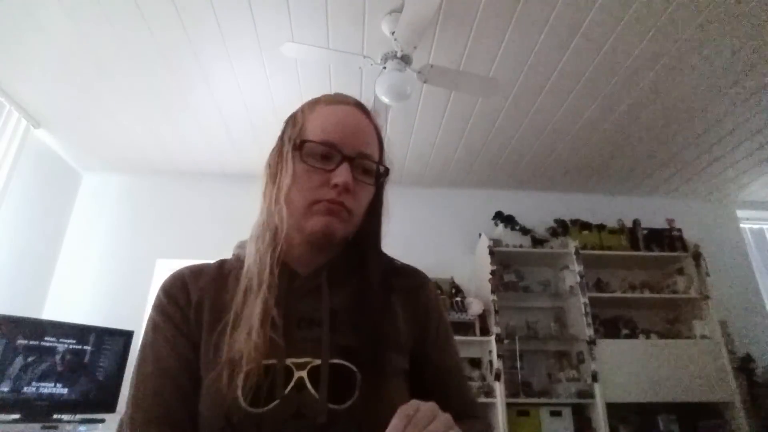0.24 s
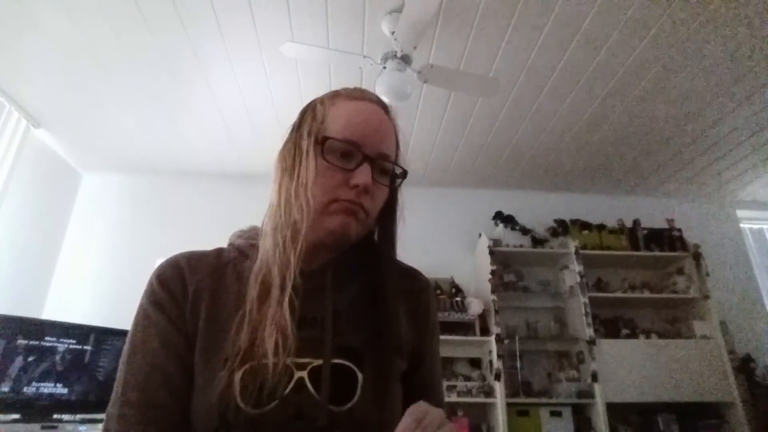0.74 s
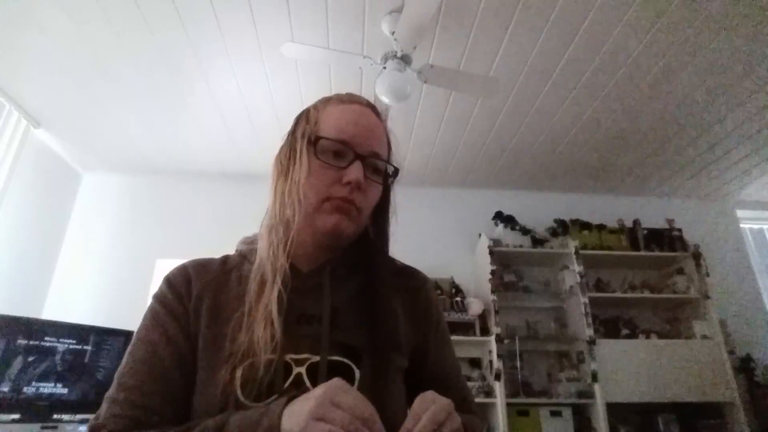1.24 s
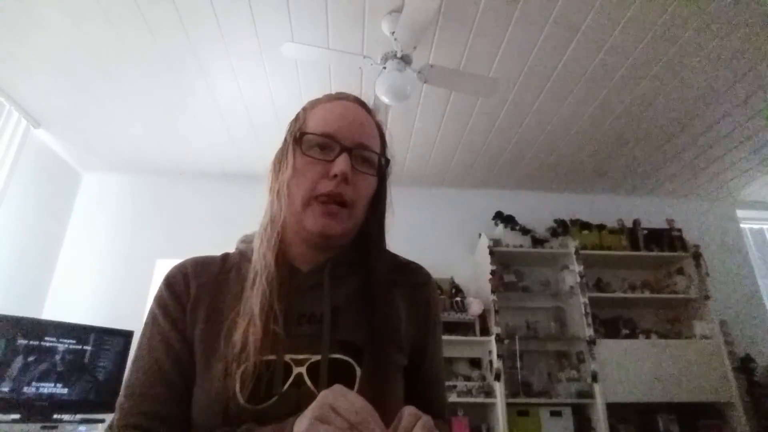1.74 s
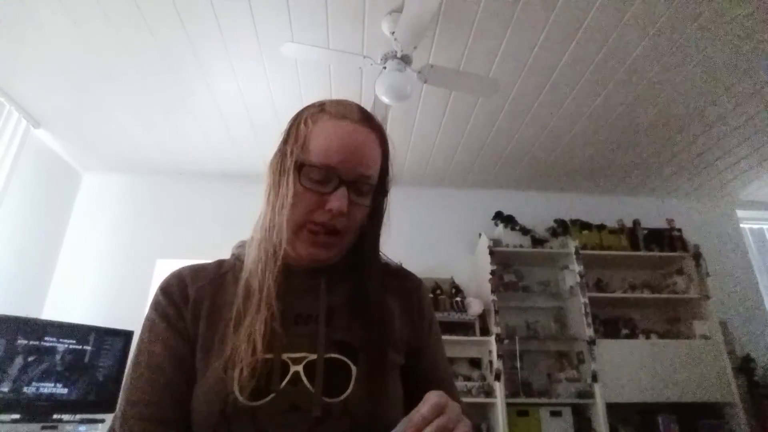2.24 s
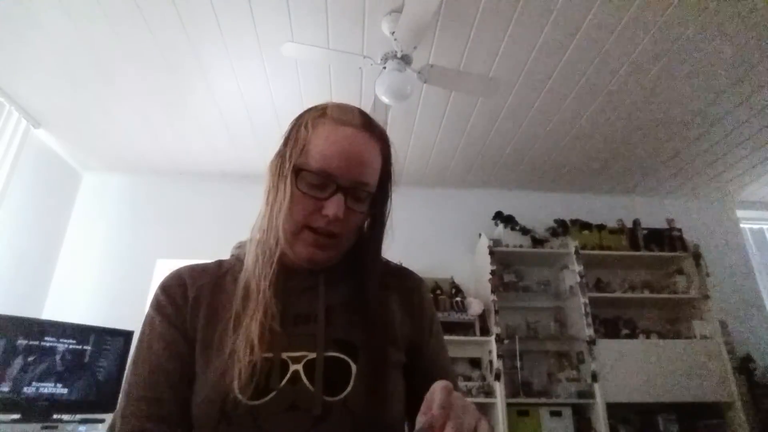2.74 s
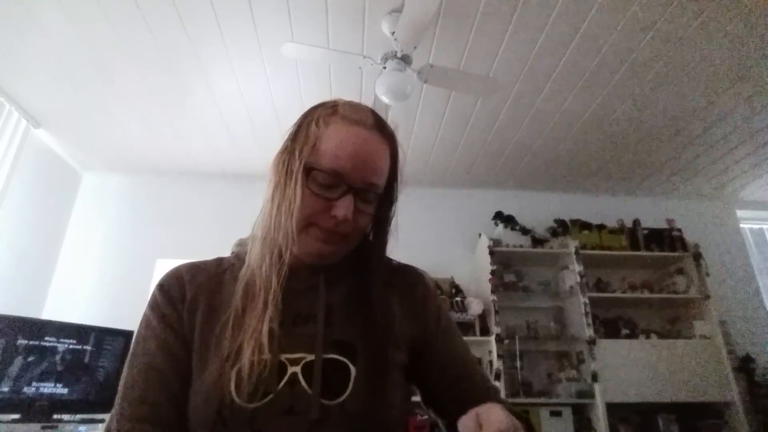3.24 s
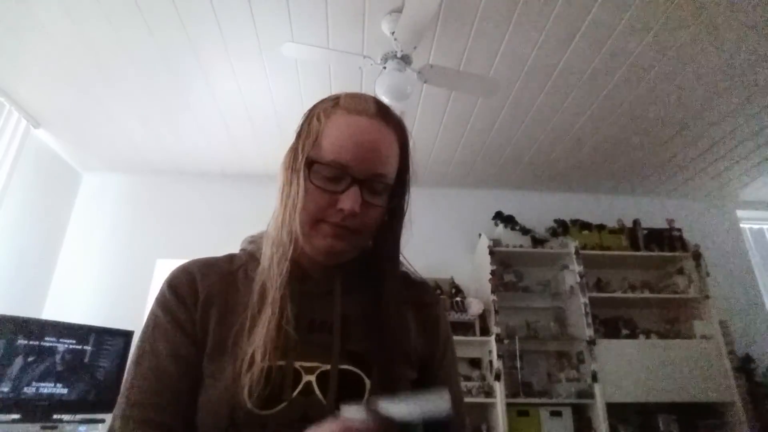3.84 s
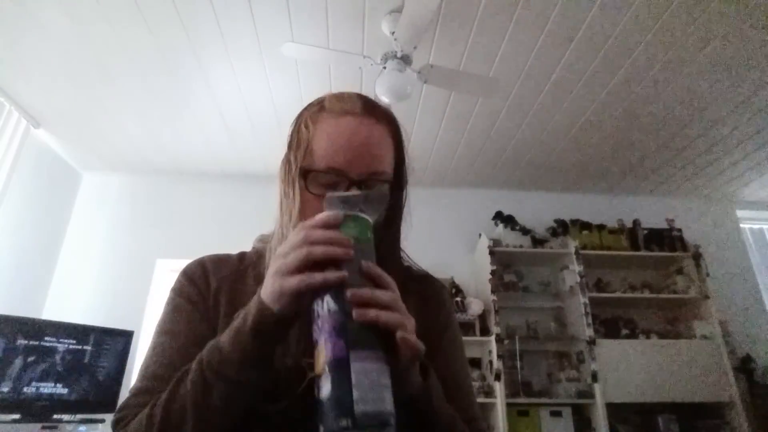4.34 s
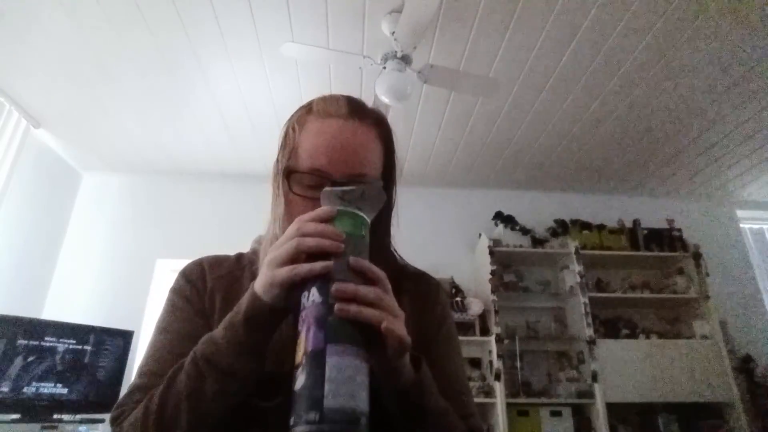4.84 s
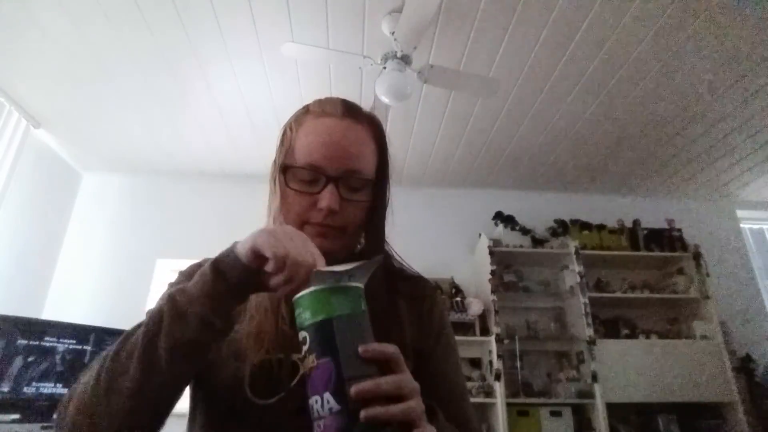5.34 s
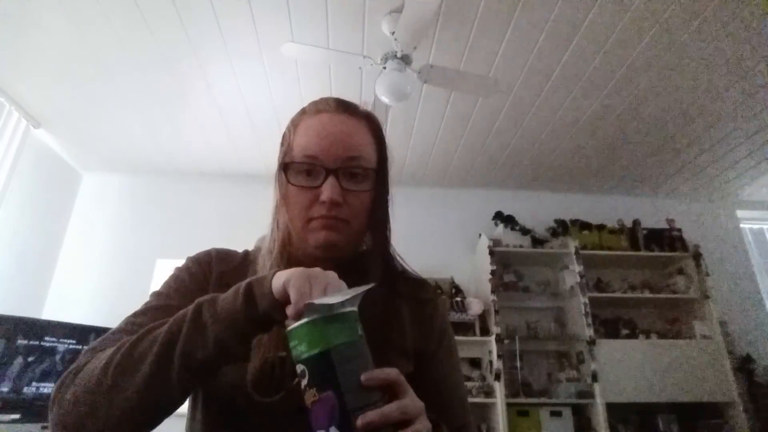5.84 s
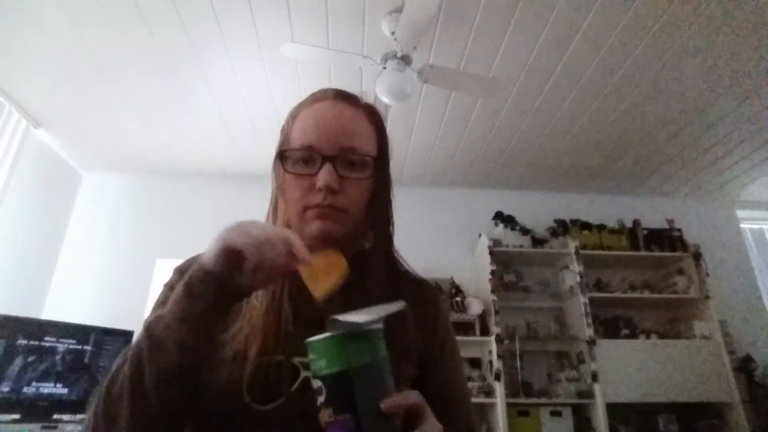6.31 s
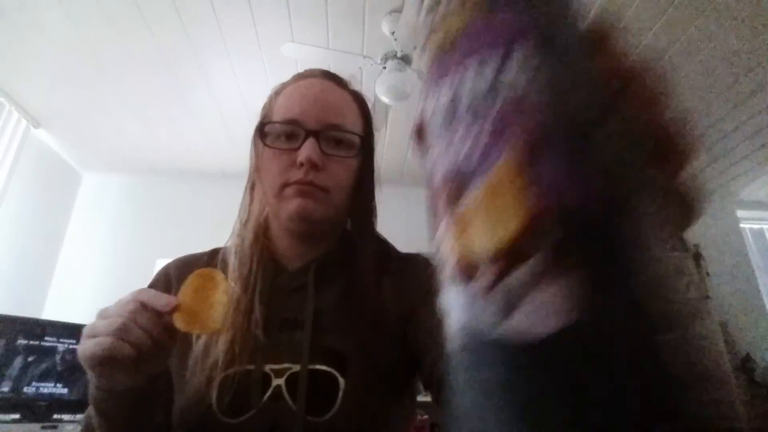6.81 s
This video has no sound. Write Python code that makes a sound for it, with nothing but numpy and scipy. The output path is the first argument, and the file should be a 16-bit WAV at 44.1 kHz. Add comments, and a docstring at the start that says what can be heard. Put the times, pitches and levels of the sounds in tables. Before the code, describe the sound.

Close by in a quiet room, a plastic lid pops hollowly off a cardboard tube, its foil seal rips, and a chip slides out.

```python
"""Fingers are heard first, rubbing and slipping on the plastic lid of a cardboard snack can, close by
in a quiet living room, until the lid pops off. The foil seal is torn in a few crackling pulls while the
air in the tube rings higher; then the can is lifted and a chip is drawn out with slides and knocks.
Friction and tearing are random grains of decaying noise, struck parts are sums of dying sines, and the
can is a bank of resonators; a sparse decaying echo adds the room, filtered noise and a hum the background."""
import sys
import numpy as np
from scipy import signal
from scipy.io import wavfile

SR = 44100
rng = np.random.default_rng(int(sys.argv[2]) if len(sys.argv) > 2 else 0)


def bounce(signal):
    """Save signal as a 16-bit WAV file at the path given by the first command-line argument."""
    frames = np.transpose(np.atleast_2d(signal))
    limited = np.clip(frames, -1, 1)
    pcm = np.round(limited * 32767).astype(np.int16)
    wavfile.write(sys.argv[1], SR, pcm)


N = 311875
TIME = np.arange(N) / SR  # seconds

# Spectrum of the steady background. Each row: frequency in Hz, gain in dB.
BACKGROUND_COLOUR = [(20, -49), (45, -37), (90, -47), (160, -54), (280, -57), (450, -66), (750, -71),
                     (1100, -87), (2200, -93.5), (4000, -89), (10500, -100), (11700, -90), (12800, -94),
                     (16000, -93.5)]
# Noise that differs between the ports, against the shared noise. Each row: frequency in Hz, gain in dB.
BACKGROUND_APART = [(300, -17), (1500, 7.5), (5000, 0.5)]
HUM_HZ, HUM_DB = 48.8, -68
# Spells of faint high hiss. Each row: middle in seconds, relative level in dB.
HISS_SPELLS = [(0.238, -73), (.432, -73), (.98, -69.5), (2.275, -77), (3.719, -75), (4.018, -76),
               (4.219, -75), (4.838, -80.5), (5.05, -87), (6.278, -76.5), (6.89, -79), (7.03, -82.5)]
# Spectrum of that hiss. Each row: frequency in Hz, gain in dB.
HISS_COLOUR = [(4000, -31.5), (9000, -22), (11400, -5), (11650, 15.5), (11900, 5), (12150, -4.5),
               (15000, -10)]
HISS_S = 0.079  # length of each spell

# Decay of the room by band. Each row: frequency in Hz, time to fall by 60 dB in seconds.
ROOM_T60 = [(100, 0.54), (500, 0.39), (2000, 0.38), (8000, 0.27), (16000, 0.26)]
# Likeness of the echo at the two ports. Each row: frequency in Hz, correlation from 0 to 1.
ROOM_LIKENESS = [(400, 0.45), (1500, .7), (4000, 0.26)]
# Responses of the two microphone ports. Each row: frequency in Hz, gain in dB.
LEFT_PORT = [(200, -.5), (700, -.3), (1050, -5), (1600, -3), (2900, -4), (3800, -13), (6300, -11),
             (7200, -13), (8400, -2), (10100, -1), (10800, 10), (12100, 13), (12900, 7), (15600, 1)]
RIGHT_PORT = [(200, .5), (700, .3), (980, -4), (1300, 5), (1900, 4), (2800, 0), (3300, -8), (4500, 4),
              (5000, -2), (7000, 5), (9600, 4), (10200, -2), (11900, 2), (15600, -7)]
BASS_CUT_HZ, EDGE_HZ = 43, 15900

# Hands shifting on the cardboard. Each row: middle in seconds, length in seconds, relative level in dB.
GRIP_STROKES = [(.2, 0.2, -74), (1.25, 0.97, -78), (1.83, 0.48, -73), (2.17, 0.26, -71.5),
                (2.42, 0.45, -63), (2.55, 0.24, -68), (3.29, 0.11, -60), (3.48, 0.26, -67),
                (3.72, 0.57, -69.5), (4.1, 0.4, -66.5), (4.46, 0.19, -73), (4.7, .16, -71), (4.98, .3, -73),
                (5.71, 0.13, -69.5), (6.12, 0.69, -68.5), (6.88, 0.38, -70.5), (7.06, 0.13, -59.5)]
# Spectrum of gripped cardboard. Each row: frequency in Hz, gain in dB.
GRIP_COLOUR = [(30, -16.5), (90, -4.5), (170, 3), (300, 7.5), (420, 2.5), (560, -8), (800, -8),
               (1100, -11.5), (3000, -65), (16000, -51)]
HOLD_DB = -75.5  # drive from fingers creeping on the can all the while
# Fingers and chips bumping the tube. Each row: time in seconds, ring level in dB, dull thud level in dB.
KNOCKS = [(0.177, -84, -44), (.375, -68, -43), (0.938, -58.5, -37), (1.177, -77, -41.5),
          (1.611, -75.5, -44), (2.007, -50, -35.5), (2.118, -67, -43.5), (2.499, -56.5, -46),
          (2.605, -52.5, -74), (3.705, -57, -53), (3.815, -60.5, -57), (4.022, -54, -68),
          (4.159, -58.5, -56), (4.989, -59.5, -57), (5.073, -66.5, -53), (5.586, -52.5, -69),
          (5.967, -62, -42), (6.018, -56.5, -79), (6.166, -56.5, -87), (6.507, -61, -70),
          (6.607, -59.5, -63), (6.919, -68, -40.5), (7.009, -58, -59.5), (7.057, -62, -43)]
# Ringing of the bumped tube. Each row: frequency in Hz, level in dB, time to fall by 60 dB in seconds.
KNOCK_MODES = [(262, 0, 0.19), (281.8, -0.5, 0.0094), (390, -12, .05), (520, -13.5, 0.1), (780, -6, .04)]
# Treble loss under soft fingertips. Each row: frequency in Hz, gain in dB.
FINGERTIP_COLOUR = [(100, 1.0), (500, 0), (900, -14), (1800, -42.5), (5000, -41)]
# Lowest air resonance of the tube, rising as its mouth is uncovered and later settling lower.
# Each row: time in seconds, frequency in Hz.
TUBE_HZ = [(2.3, 217), (2.72, 224), (2.83, 246), (2.96, 268), (3.07, 266.6), (3.6, 248)]

# Fingers picking at the foil tab, later the loose foil settling.
# Each row: middle in seconds, length in seconds, relative level in dB.
FOIL_RUB = [(2.17, 0.039, -73), (2.35, 1.9, -78), (2.485, 0.062, -67.5), (2.62, 0.36, -84),
            (3.55, 1.33, -84), (3.6, 0.044, -72), (3.7, 0.2, -87), (3.82, 0.013, -77.5)]
# Spectrum of rubbed foil. Each row: frequency in Hz, gain in dB.
FOIL_RUB_COLOUR = [(100, -17), (620, 18.5), (1000, 4.5), (2000, -0.5), (3200, 1), (8000, -16.5),
                   (16000, -6)]
# Fingers and a chip sliding in the tube. Each row: middle in seconds, length in seconds, relative level in dB.
SLIDE_STROKES = [(5.69, 0.14, -74.5), (5.83, 0.086, -90.5), (5.915, .025, -80), (6.021, 0.0077, -73.5),
                 (6.14, 0.27, -89)]
# Spectrum of the sliding. Each row: frequency in Hz, gain in dB.
SLIDE_COLOUR = [(300, -12.5), (1500, -9.5), (2100, 0.5), (2700, 11.5), (3600, 5), (5000, 0), (9000, -5),
                (16000, -1)]
# Nails, foil and chips tapping.
# Each row: time in seconds, click level in dB, ring frequency in Hz, ring level in dB.
TICKS = [(0.376, -43.5, 4350, -41), (1.355, -51, 13100, -44), (1.364, -77, 4750, -51),
         (1.614, -71, 737.6, -51.5), (2.488, -70, 2710, -53), (2.531, -52.5, 2200, -55.5),
         (2.602, -58, 2760, -55), (3.146, -50, 520, -30.5), (3.328, -56, 1810, -48),
         (3.604, -58, 2070, -50.5), (3.813, -53, 800, -50.5), (4.158, -68.5, 567, -56.5),
         (4.19, -63, 2010, -72), (5.051, -57, 2890, -57), (6.086, -60, 2650, -67),
         (6.214, -60.5, 2810, -75)]
# Spectrum of the tap clicks. Each row: frequency in Hz, gain in dB.
TICK_COLOUR = [(200, -10.5), (1000, 22), (1600, 8), (3000, 1.5), (4600, -1), (8000, -2.5), (11000, 4.5),
               (16000, -20.5)]

# Finger strokes on the lid and rim. Each row: middle in seconds, length in seconds, relative level in dB.
LID_RUB = [(-0.014, 0.055, -68.5), (0.246, 0.27, -71), (0.854, 0.093, -63), (0.933, 0.064, -66),
           (0.994, 0.15, -67.5), (1.095, 0.051, -65), (1.173, 0.072, -64), (1.257, 0.037, -67),
           (1.38, 0.11, -68.5), (1.442, 0.012, -62.5), (1.776, 0.014, -72)]
# Rim of the lid slipping over the bead of the can. Each row: time in seconds, relative level in dB.
LID_SLIPS = [(.087, -53), (.093, -54.5), (.223, -48), (.268, -48), (.936, -38), (.944, -39.5), (.951, -52),
             (1.022, -61), (1.177, -42.5), (1.184, -46), (1.752, -63)]
# Duller part of the slips. Each row: frequency in Hz, gain in dB.
SLIP_COLOUR = [(150, -13), (600, 9), (2000, -4.5), (5000, -13), (14000, -8.0)]
# Resonances of the lid seated on the can. Each row: frequency in Hz, width in Hz, gain in dB.
LID_SEATED = [(626, 84, 2.5), (770, 60, 5), (1433, 79, 13.5), (1592, 100, 12), (1763, 53, 11.5)]
# Spectrum of rubbed plastic on the can. Each row: frequency in Hz, gain in dB.
LID_COLOUR = [(60, -9), (250, 21.5), (700, 7), (1000, 5.5), (1600, -2), (2400, 1.5), (3200, -1.5),
              (4500, -1.5), (8000, -9.5), (12000, 2), (16000, -23)]
# The lid springing free and wobbling.
# Each row: time in seconds, push level in dB, rim scrape level in dB, scrape decay constant in seconds.
POPS = [(1.891, -53, -54.5, 0.043), (1.908, -37.5, -27.5, 0.015), (1.9188, -23, -29.5, 0.03),
        (1.943, -54.5, -29.5, 0.0082), (2.008, -42.5, -49, 0.016), (2.019, -63, -51.5, 0.0078)]
# Lid and tube ringing after the pop. Each row: frequency in Hz, level in dB, time to fall by 60 dB in seconds.
LID_MODES = [(72, -18.5, 0.074), (117.7, 1.5, 0.068), (193.8, 1, 0.11), (382.5, -24.5, 0.51),
             (870, -9.5, 0.096), (1195, -20, 0.13), (1306, -13, 0.052), (1650, -20, 0.029)]
# Spectrum of the rim scrape. Each row: frequency in Hz, gain in dB.
SCRAPE_COLOUR = [(60, -5), (400, 15), (1000, 1), (1500, -6), (3000, 0), (7000, -7), (12000, -10),
                 (16000, -14)]

# Pulls on the foil. Each row: start in seconds, length in seconds, relative crackle level in dB,
# swell of the crackle over the pull in dB, relative level of the shaking of the can in dB.
PULLS = [(2.678, .064, -44.5, 10.5, -35.5), (2.785, 0.012, -34, -3, -33), (2.822, .15, -38, 5, -35.5),
         (3.037, 0.067, -36, 2, -35), (3.148, 0.072, -55, 4, -46.5)]
# A pull bites at once; when it stops the foil falls quiet at its own pace and the can at another.
PULL_ATTACK_S, CRACKLE_RELEASE_S, SHAKE_RELEASE_S = .005, 0.015, 0.014
# Loudest snaps of the glued seam giving way. Each row: time in seconds, relative level in dB.
SNAPS = [(2.7203, -22), (2.743, -25.5), (2.7893, -28), (2.8252, -19), (2.838, -18), (2.8464, -22.5),
         (2.8571, -18.5), (2.897, -20), (2.905, -19), (2.9159, -15), (2.9259, -17), (2.9336, -12.5),
         (2.9632, -16.5), (3.027, -25), (3.041, -19.5), (3.0565, -19), (3.0949, -26), (3.122, -28.5),
         (3.1622, -28.5), (3.1736, -25), (3.1831, -22), (3.207, -24.5), (3.2367, -24.5), (3.328, -38.5)]
# Spectrum of tearing foil. Each row: frequency in Hz, gain in dB.
FOIL_COLOUR = [(100, -12), (700, -11), (1200, 11), (3000, 7), (7000, 2), (12000, 4), (16000, 0)]
# Resonances of the can under the stretched foil. Each row: frequency in Hz, width in Hz, gain in dB.
CAN_MODES = [(89, 70, -11), (360, 40, 1.5), (410, 15, -10), (580, 99, -14), (800, 100, -3.5),
             (1140, 1300, -15), (1680, 210, -15.5), (2430, 130, -16)]
# Spectrum of the sound radiated by the shaken can. Each row: frequency in Hz, gain in dB.
CAN_COLOUR = [(40, 14.0), (250, 16.5), (400, 17.5), (800, 15.5), (1000, 11.5), (1600, 11.5),
              (2500, 16), (3500, 5.5), (8000, -22)]


def gain_of(db):
    """The decibel is logarithmic: 20 dB are a factor of ten in amplitude."""
    return 10 ** (np.asarray(db) / 20)


def evened(x):
    """Normalisation: the mean power is brought to 1."""
    return x / np.sqrt(np.mean(x ** 2) + 1e-20)


def read(points, hz):
    """Interpolation of a spectrum table on a logarithmic frequency axis."""
    f, value = np.transpose(points)
    return np.interp(np.log(hz + 1), np.log(f + 1), value)


def add(mix, s, sound):
    """Superposition: a sound is summed into the mix at time s."""
    part = mix[:, max(round(s * SR), 0):][:, :sound.shape[-1]]
    part += sound[..., :part.shape[1]]


def colour(x, points, size=4096):
    """Minimum-phase filtering: the log gain fixes the phase, so the response is causal."""
    hz = abs(np.fft.fftfreq(size, 1 / SR))
    log_gain = np.log(gain_of(read(points, hz)))
    spectrum = np.exp(np.conj(signal.hilbert(log_gain)))
    response = np.fft.ifft(spectrum).real[:size // 2]
    return signal.oaconvolve(np.atleast_2d(x), response[None], axes=1)[:, :N]


def resonate(x, hz, width):
    """Resonance of peak gain 1 that may glide: shift to 0 Hz, low-pass, shift back."""
    turn = np.exp(2j * np.pi * np.cumsum(hz * np.ones(N)) / SR)
    r = np.exp(-np.pi * width / SR)
    envelope = signal.lfilter([1 - r], [1, -r], x / turn + 1e-18)
    return 2 * (turn * envelope).real


def ring(modes):
    """Modal decay: a struck object sounds as a sum of exponentially dying sines."""
    t = TIME[:SR // 2]
    out = np.zeros(len(t))
    for hz, db, t60 in modes:
        out += gain_of(db) * np.exp(-np.log(1000) * t / t60) * np.sin(2 * np.pi * hz * t)
    return out


def burst(decay, apart=0.68, size=8192):
    """Microfracture: a dying spurt of noise, differing more between the ports at higher frequency."""
    shape = np.exp(-TIME[:size] / decay)
    z = rng.standard_normal((3, size))
    differing = signal.lfilter([2, -2], [1, -.5], z[1:])
    spurt = (z[0] + apart * differing) * shape
    # the spurt carries the energy of its envelope
    return spurt * np.linalg.norm(shape) / np.linalg.norm(spurt, axis=1, keepdims=True)


def clicks(rows, decay):
    """Impulsive excitation: one short noise burst for each row (s, dB)."""
    out = np.zeros((2, N))
    for s, db in rows:
        add(out, s, gain_of(db) * burst(decay))
    return out


def crackle(per_s, spread_db, decay, count=8):
    """Stick and slip: random grains of several shapes and uneven size, together of rms 1."""
    present = rng.random(N) < per_s / SR
    size = gain_of(spread_db * np.minimum(rng.exponential(1, N), 3)) * present
    kind = rng.integers(0, count, N)
    out = np.zeros((2, N))
    for k in range(count):
        grain = burst(decay)[:, :SR // 100]
        out += signal.oaconvolve((size * (kind == k))[None], grain, axes=1)[:, :N]
    return evened(out)


def strokes(rows, taper=0.74):
    """Amplitude envelope of movements (middle s, length s, dB) that each swell, hold and fade."""
    out = np.zeros((1, N))
    for s, length, db in rows:
        add(out, s - length / 2, gain_of(db) * signal.windows.tukey(round(length * SR), taper))
    return out[0]


def tube(x, width):
    """Air-column resonance of the can, its frequency following the opening of the mouth."""
    return resonate(x, np.interp(TIME, *np.transpose(TUBE_HZ)), width)


def background():
    """Broadband noise: a rumble nearly alike at both ports, a hiss that differs, and a low sine hum."""
    z = rng.standard_normal((3, N))
    noise = z[0] + colour(z[1:], BACKGROUND_APART)
    hum = gain_of(HUM_DB) * np.sin(2 * np.pi * HUM_HZ * TIME)
    return colour(noise, BACKGROUND_COLOUR) + hum


def high_hiss():
    """Band-shaped noise under an envelope: a thin high hiss comes and goes, with no echo."""
    spells = strokes([(s, HISS_S, db) for s, db in HISS_SPELLS], taper=0.39)
    return colour(gain_of(7.5) * spells * rng.standard_normal((2, N)), HISS_COLOUR)


def room(x, gap=0.002):
    """Reverberation: sparse reflections after a gap in s, decaying by band, partly alike at both ports."""
    t = TIME[:SR // 2]
    signs = rng.choice([-1., 1.], (2, len(t)))
    present = rng.random((2, len(t))) < 3000 / SR
    reflections = signs * present * (t > gap)
    hz, age, z = signal.stft(reflections, SR, nperseg=256)
    same = np.clip(read(ROOM_LIKENESS, hz), 0, 1)[:, None]
    z = np.array([z[0], same * z[0] + np.sqrt(1 - same ** 2) * z[1]])
    decay = np.exp(-np.log(1000) * age / read(ROOM_T60, hz)[:, None])
    tail = signal.istft(z * decay, SR, nperseg=256)[1]
    return signal.fftconvolve(x, tail / np.linalg.norm(tail[0]), axes=1)[:, :N]


def from_the_right(x, count=2):
    """Arrival-time difference: the can is a little to the right, so the left port lags by count samples."""
    return np.array([np.pad(x[0], (count, 0))[:N], x[1]])


def bumps():
    """Impact: each bump excites the modes of the tube and a dull, quickly spent thud."""
    u = TIME[:SR // 2] / 0.0018
    thud = 2 * (1 - u) * np.exp(-u) * (1 - np.exp(-u * 4))
    knock = ring(KNOCK_MODES)
    out = np.zeros((2, N))
    for s, ring_db, thud_db in KNOCKS:
        add(out, s, gain_of(ring_db) * knock + gain_of(thud_db) * thud)
    # soft fingertips cannot excite the treble
    return colour(out, FINGERTIP_COLOUR)


def handling():
    """Friction drives resonance: hands shift on the cardboard and bump it, and the tube hums along."""
    grains = evened(crackle(per_s=1100, spread_db=3.5, decay=0.00026).mean(0))
    drive = (gain_of(HOLD_DB) + strokes(GRIP_STROKES)) * grains
    cardboard = gain_of(7.5) * colour(drive, GRIP_COLOUR)
    hollow = gain_of(16) * tube(drive, width=32)
    return cardboard + hollow + bumps()


def rustle():
    """Granular friction: loose foil and sliding chips, each with its own grains and spectrum."""
    foil_grains = crackle(per_s=3000, spread_db=1.5, decay=.0003)
    slide_grains = crackle(per_s=6300, spread_db=2.5, decay=0.00023)
    foil = gain_of(9.5) * strokes(FOIL_RUB) * foil_grains
    slide = gain_of(8.0) * strokes(SLIDE_STROKES) * slide_grains
    return colour(foil, FOIL_RUB_COLOUR) + colour(slide, SLIDE_COLOUR)


def taps(cycles=18):
    """Impact and modal response: a click, then a ring of whatever was touched, down 60 dB in 18 cycles."""
    out = colour(clicks([row[:2] for row in TICKS], decay=0.00075), TICK_COLOUR)
    for s, _, hz, ring_db in TICKS:
        add(out, s, ring([(hz, ring_db, cycles / hz)]))
    return out


def lid_prying():
    """Friction on a resonant plate: strokes hiss, rim slips are duller, the seated lid resonates to both."""
    rub = strokes(LID_RUB) * crackle(per_s=700, spread_db=-2.5, decay=0.00057)
    slips = clicks(LID_SLIPS, decay=.0022)
    drive = (rub + slips).mean(0)
    lid = sum(gain_of(db) * resonate(drive, hz, width) for hz, width, db in LID_SEATED)
    return colour(rub + lid + colour(slips, SLIP_COLOUR), LID_COLOUR)


def lid_pop():
    """Sudden release: the rim scrapes over the bead; the lid sucks air out of the tube and rings with it."""
    scrape, boom = np.zeros((2, N)), np.zeros((2, N))
    for s, push_db, scrape_db, decay in POPS:
        add(scrape, s, gain_of(scrape_db) * burst(decay))
        # suction: the ring starts with negative pressure
        add(boom, s, -gain_of(push_db) * ring(LID_MODES))
    return colour(scrape, SCRAPE_COLOUR), boom


def pulling():
    """Force envelopes of crackle and shaking: a pull bites, holds while the seam runs, and dies away."""
    tearing, shaking = np.zeros(N), np.zeros(N)
    for s, length, crackle_db, swell_db, shake_db in PULLS:
        bite = np.clip((TIME - s) / PULL_ATTACK_S, 0, 1)
        progress = np.clip((TIME - s) / length, 0, 1)
        after = np.maximum(TIME - s - length, 0)
        swelling = gain_of(crackle_db + swell_db * progress)
        tearing += bite * swelling * np.exp(-after / CRACKLE_RELEASE_S)
        shaking += bite * gain_of(shake_db) * np.exp(-after / SHAKE_RELEASE_S)
    return tearing, shaking


def seam_snaps(decay=0.00099, ring_db=-2):
    """Fracture and ring: each snap also rings a small facet of foil at a random pitch of its own."""
    out = clicks(SNAPS, decay)
    for (s, db), u in zip(SNAPS, rng.random(len(SNAPS))):
        add(out, s, ring([(3000 + 10000 * u, db + ring_db, .004)]))
    return out


def shiver(x, share_db, decay):
    """Dense modes act as decaying noise: the can wall rings on briefly after each click."""
    wall = burst(decay, size=2048)
    wall *= gain_of(share_db) / np.linalg.norm(wall[0])
    return x + signal.oaconvolve(x, wall, axes=1)[:, :N]


def foil_tear():
    """Fracture drives resonance: the seam parts in crackle and snaps, which shake the can and its air."""
    grains, snaps = crackle(per_s=1800, spread_db=3.5, decay=0.00022), seam_snaps()
    tearing, shaking = pulling()
    seam = gain_of(-3.5) * grains * tearing + gain_of(-8) * snaps
    # the stiff can gives less than in proportion to the hardest tugs
    yielding = evened(np.tanh(grains.mean(0)))
    tugs = yielding * shaking + gain_of(-11.5) * snaps.mean(0)
    air = gain_of(7) * tube(tugs, width=29.7)
    can = sum(gain_of(db) * resonate(tugs, hz, width) for hz, width, db in CAN_MODES)
    foil = colour(shiver(seam, share_db=-8.0, decay=0.0056), FOIL_COLOUR)
    return foil + colour(air + can, CAN_COLOUR)


def scene():
    """Superposition of direct sound, reverberation and background; each source has its share of the room."""
    scrape, boom = lid_pop()
    tear, ticks = foil_tear(), taps()
    small = lid_prying() + handling() + rustle()
    direct = scrape + boom + tear + small + ticks
    to_room = gain_of(-8.5) * scrape + gain_of(-18.5) * boom + gain_of(-13.0) * tear
    to_room = to_room + gain_of(-6.0) * small + gain_of(-7.0) * ticks
    return from_the_right(direct) + room(to_room) + background() + high_hiss()


def record(dry):
    """Linear filtering by the receiver: each port colours its channel; then bass cut and band limit."""
    ports = np.vstack([colour(dry[0], LEFT_PORT), colour(dry[1], RIGHT_PORT)])
    bass_cut = signal.butter(4, BASS_CUT_HZ, "highpass", fs=SR, output="sos")
    ports = signal.sosfilt(bass_cut, ports)
    band_limit = signal.firwin(511, EDGE_HZ, window=("kaiser", 9), fs=SR)
    return signal.oaconvolve(ports, band_limit[None], "same")


dry = scene()
out = record(dry)
bounce(out)
```